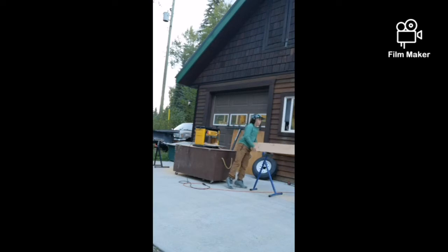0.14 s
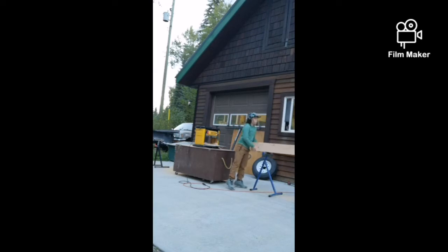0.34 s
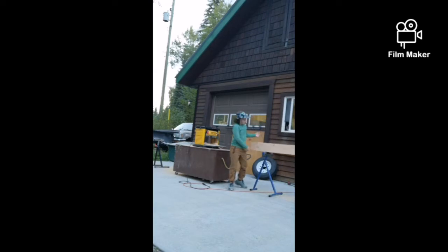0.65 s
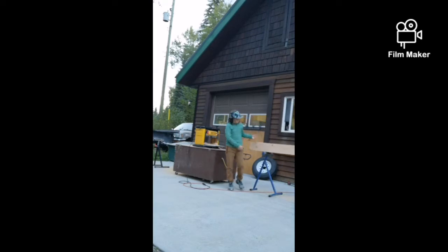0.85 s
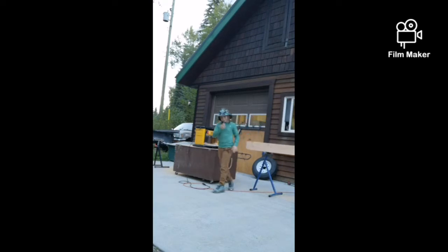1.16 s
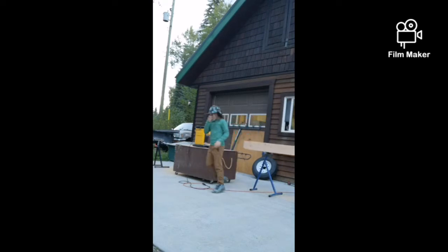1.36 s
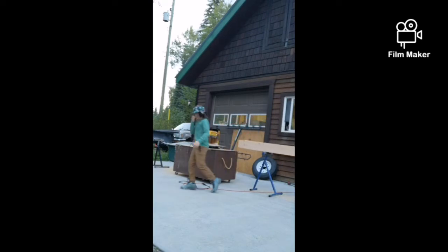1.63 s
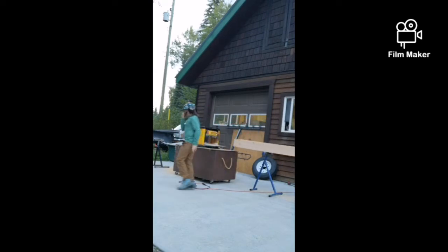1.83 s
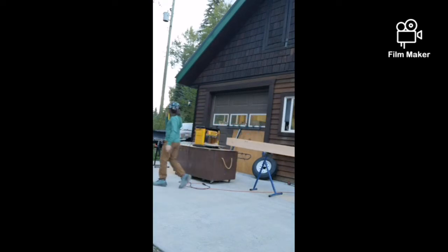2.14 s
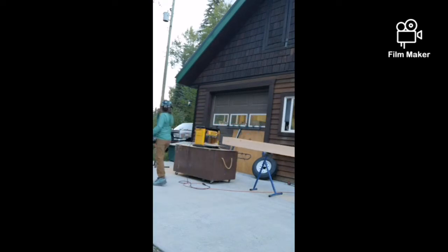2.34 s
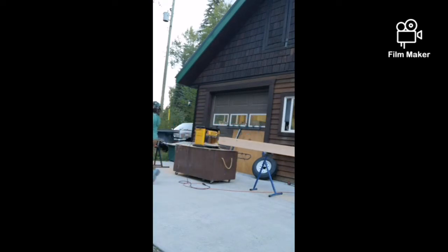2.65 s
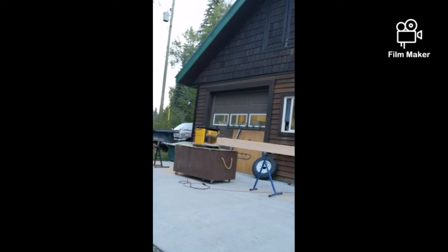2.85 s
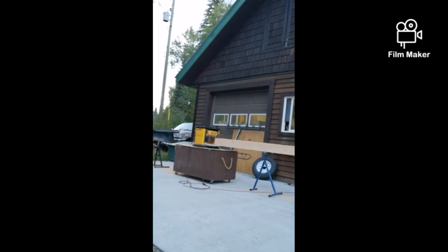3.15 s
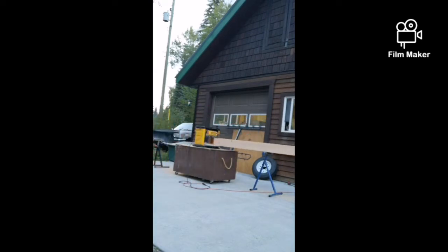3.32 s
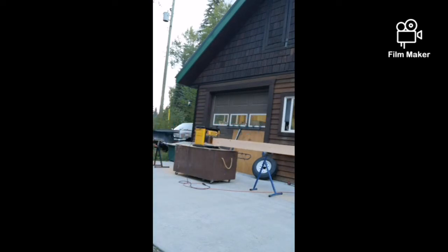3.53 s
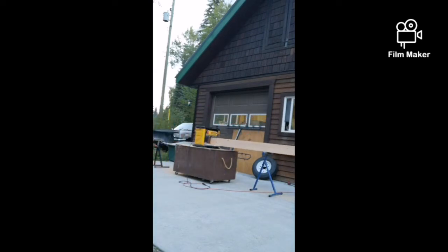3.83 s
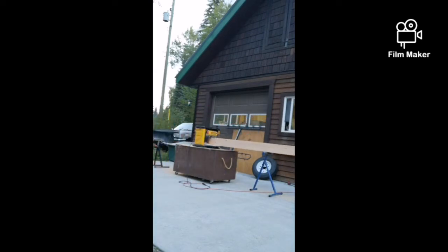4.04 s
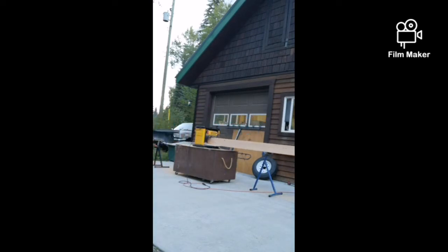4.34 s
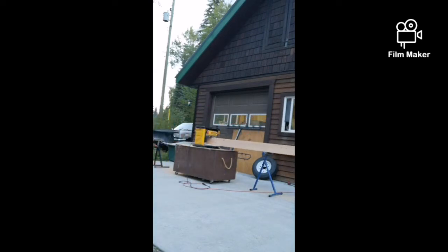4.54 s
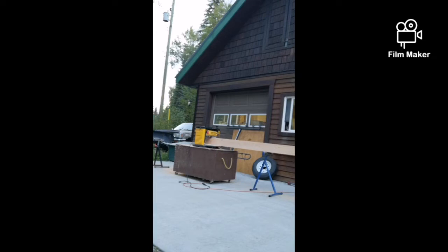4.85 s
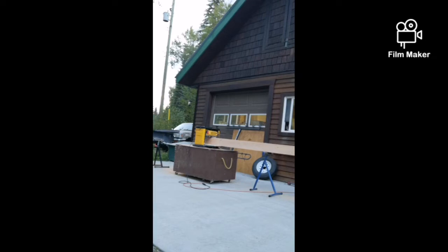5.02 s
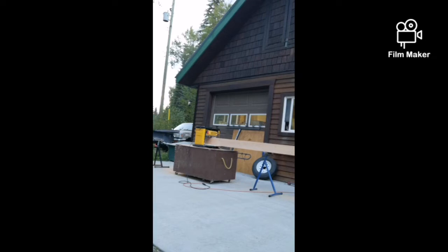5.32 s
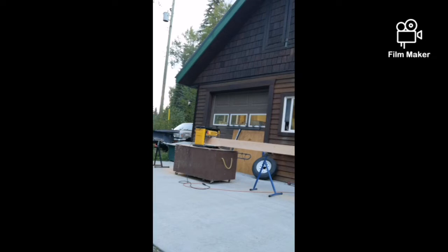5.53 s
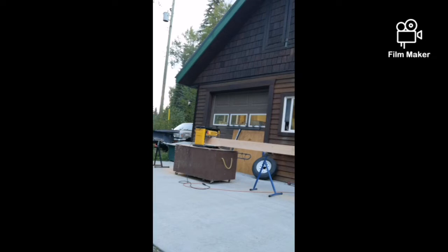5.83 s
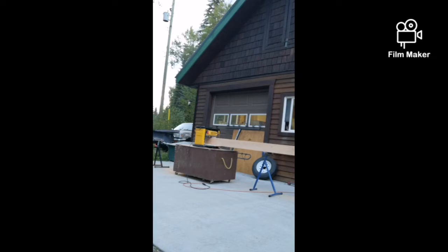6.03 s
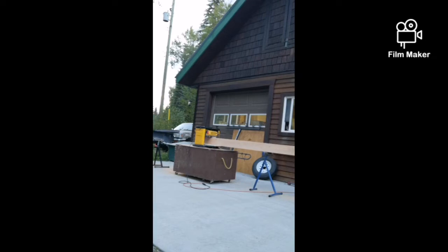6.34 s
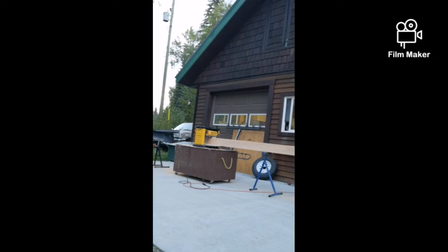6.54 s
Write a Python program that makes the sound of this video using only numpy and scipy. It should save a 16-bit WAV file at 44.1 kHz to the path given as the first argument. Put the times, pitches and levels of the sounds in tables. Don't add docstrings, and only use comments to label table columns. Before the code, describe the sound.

From 0 s a benchtop planer idles in an open paved yard: a constant low hum near 172 Hz, broad blowing fan roar and a thin electric whine, with slight wavering. Around 1.4 to 1.8 s the brightness dips gently as someone passes, then returns. A soft low wind puff comes at 3.2 s, with faint distant engine drone under the machine around 3 to 4.5 s. At about 4.66 s the knives strike a wooden post with a hard, bright bite, turning into a dense, raspy buzz with torn chips. From 4.8 to 5.8 s pitch slides down to about 131 Hz, whine fading, wood and housing ringing unevenly. It holds roughly steady, then at 6.2 to 6.35 s a knot brings a louder, squealing strain and another small sag. Cutting continues to the end near 6.7 s. Mono phone sound, metres away, dull above 8 kHz.

```python
import sys
import numpy as np
from scipy import signal
from scipy.fft import rfft, irfft
from scipy.io import wavfile
from scipy.ndimage import uniform_filter1d

SR = 44100
rng = np.random.default_rng(int(sys.argv[2]) if len(sys.argv) > 2 else 0)


def waveform_to_disk(signal):
    frames = np.transpose(np.atleast_2d(signal))
    scaled = np.clip(frames, -1, 1) * 32767
    samples = np.round(scaled).astype(np.int16)
    wavfile.write(sys.argv[1], SR, samples)


def level_to_linear(level):
    exponent = np.asarray(level, float) / 20
    return 10 ** exponent


N = 294588
TIME = np.arange(N) / SR

# time_s, turn_rate_hz
HEAD_SPEED = [(0, 171.93), (2.4, 172.1), (4.15, 172.05), (4.52, 171.72), (4.7, 171.2), (4.78, 170.04),
              (4.94, 165.67), (5.22, 157.42), (5.3, 154.31), (5.4, 149.39), (5.64, 135.84), (5.69, 133.66),
              (5.74, 132.45), (5.84, 131.44), (6.12, 131.42), (6.21, 130.34), (6.365, 127.55),
              (6.67, 128.31)]
IDLE_HZ, LOADED_HZ = 172, 128
MOTOR_PER_HEAD = 1.9777
MAINS_HZ = 120

# multiple, level_db
HEAD_ORDERS = [(3, -48), (4, -51.5), (6, -45), (20, -52)]
# pitch_hz, level_db
BED_ONCE = [(128, -36), (133.5, -35.5), (136, -26), (148, -19), (157.5, -25.5), (160.3, -38),
            (163.8, -19.5), (172, -20.5)]
# pitch_hz, level_db
BED_TWICE = [(256, -35), (265, -35.5), (272, -21.5), (282, -42), (299, -20.5), (313, -32), (340, -37),
             (344, -35.5)]
# centre_s, length_s, once_a_turn_db, twice_a_turn_db
POST_LEANS = [
    (.3, 0.76, 0, -4.5),
    (4.48, 0.11, -3, 1.5),
    (4.78, .04, -1.5, -2),
    (5.66, 0.034, 0, 3),
    (5.9, 0.097, -1, -16),
    (6.08, .05, -0.5, 5.5),
    (6.22, .04, 3, 3),
    (6.54, .1, -22, -4.5),
]

# multiple, level_db
MOTOR_ORDERS = [(12, -43), (15, -45.5), (16, -40), (17, -61.5), (19, -48.5), (20, -40), (21, -50)]
# pitch_hz, density_db_per_hz
FAN_SPECTRUM = [(24, -76), (40, -52), (132, -19), (151, -13), (172, -8), (192, -17.5), (206, -29.5),
                (342, -26.5), (408, -23.5), (436, -24), (1010, -31), (1320, -33.5), (4540, -33.5),
                (6920, -29), (7900, -47.5), (10300, -95.5), (17400, -120)]
FAN_DB = -31
# pitch_hz, width_hz, level_db
DUCTS = [(68, 30, -3), (95, 14, 2.5), (149, 86, -3), (175, 45, -10.5), (249, 22, 5), (435, 28, 3.5),
         (1040, 260, 4), (1326, 170, -7.5), (1555, 180, -5), (1642, 24, 9), (1930, 180, -5),
         (2173, 460, 5.5), (2637, 380, 4), (3010, 100, -3.5), (3460, 280, 4.5), (3890, 150, -3),
         (4540, 180, -5), (5280, 130, -3), (6350, 210, 3.5), (6550, 220, -7), (7110, 690, 6)]
# idle_db, change_behind_a_passer_db, change_at_full_load_db
TREBLE, BASS, WHINE = (2.12, -3, -2.5), (1.54, 0, -6.5), (0.37, -7, -19)
WHINE_FADES_LOAD = .03, .4
PASSER_S, PASSER_NEAR_S, PASSER_LEAVE_S = 1.73, 0.27, 0.079
# centre_s, length_s, hiss_db, whine_db
BRUSH_STRAINS = [
    (1.45, .08, -1, -1.5),
    (4.55, 0.19, -0.5, -3.5),
    (5.15, .12, 1.5, -2),
    (5.58, .13, 6.5, 0),
    (5.93, .2, -1.5, 0),
    (6.25, .09, 7, 0),
]
RIPPLE_IDLE_DB, RIPPLE_LOAD_DB = -59, 12

# start_s, level_db, length_s
WIND_PUFFS = [
    (3.2, -49, 0.11),
    (3.903, -60.5, 0.089),
    (4.21, -61, 0.11),
    (6.6, -63, 0.093),
]
# centre_s, length_s, level_db, pitch_hz
DISTANT_NOTES = [
    (2.9, 0.16, -50, 96.5),
    (3.45, .17, -45.5, 90),
    (3.75, .08, -52, 92),
    (4.4, .28, -51.5, 94),
    (4.5, .24, -43.5, 1655),
]

# time_s, depth_db, hardness_db
CUT = [
    (4.66, -44, 6),
    (4.71, -24, 9.5),
    (4.94, -25.5, -4.5),
    (5.1, -27.5, 1),
    (5.45, -25, -1.5),
    (5.7, -26.5, 0),
    (5.86, -29, -1),
    (6.15, -28.5, -1),
    (6.67, -28, -1.5),
]
USUAL_DEPTH_DB = -27
# centre_s, length_s, depth_db, hardness_db
GRAIN = [
    (4.79, 0.051, 1.5, 1),
    (5.1, 0.045, 1, 2),
    (5.22, 0.049, -0.5, -2.5),
    (5.3, 0.058, -0.5, 3),
    (5.61, .07, 4, -1.5),
    (5.75, 0.026, 2, 1),
    (5.92, 0.1, 0, 1.5),
    (6.2, 0.036, 1, 2),
    (6.3, 0.071, 5, 2),
]
# time_s, stage
GRIP = [
    (4.9, 0),
    (5.1, 1),
    (5.66, 1),
    (5.76, 2),
    (6.2, 2),
    (6.32, 3),
]
# multiple, entering_db, gripped_db, past_knot_db
BITE_SHAPE = [(3, 0.5, -3.5, 0.5), (6, .5, -0.5, 0.5), (7, -2.5, 0, .5), (8, -2.5, -2.5, 0),
              (10, -2.5, -1, -2), (12, 1, 2.5, .5), (17, 0.5, 3, 0), (4, 1, 4.5, -5.5), (9, -2, -5.5, -4.5),
              (11, 0, 0, 3.5), (15, 10, -2.5, -1), (19, 3.5, 6, -2), (21, -7, -1, 2.5), (23, 0, 1.5, -9),
              (24, 10, 8.5, -6.5), (26, 10, -1.5, -3.5), (29, 1, -7, -1), (30, -1, -4, -9), (32, -7, 9, 5)]
# pitch_hz, width_hz, entering_db, deeper_db, gripped_db
POST_MODES = [(385, 28, -9, -4, -1), (424, 30, -7.5, -10, -2.5), (454, 17, -0.5, -2, -7),
              (498.5, 25, -11, -22.5, -16.5), (558, 13, -9, -5, -0.5), (602.5, 26, -13, -3, -3.5),
              (650.3, 13, -3.5, -5.5, -12), (708, 25, -9, -7, -14), (769.3, 17, -4, -6, -3),
              (865, 20, -10.5, -5.5, -13.5), (897, 25, -14, -10, -12.5), (972.4, 17, 0, -3, -4),
              (1014.4, 26, -0.5, 0, -5.5), (1081, 7.7, -2, -2, -5), (1131, 9.3, -17, -5.5, -19.5),
              (1233, 65, -7, -15.5, -19.5), (1294, 20, -12, -16, -11)]
# pitch_hz, width_hz, entering_db, deeper_db, gripped_db
HOUSING_MODES = [(1423, 15, -15, -3, -9.5), (1453, 25, -12, -7.5, -4.5), (1558, 46, -4.5, -4, -2.5),
                 (1673, 49, -19, -3.5, -17), (1729, 16, -12, 1, -4.5), (1825, 60, -7.5, -7.5, -3.5),
                 (1918, 51, -14.5, -9.5, -8.5), (2099, 43, -9, -4.5, -2.5), (2155, 23, -2.5, -7, -4),
                 (2282, 67, -9.5, -8.5, -10.5), (2344, 27, -2.5, -6.5, -3.5), (2439, 24, -12.5, -1, -6),
                 (2617, 23, -6.5, -5, -1.5), (2694, 32, -4, -5.5, -11.5), (2750, 61, -6.5, -19, -11.5),
                 (2936, 28, -6, -14, -9.5), (3030, 60, -8.5, -12, -15.5), (3130, 24, -20, -7.5, -16.5),
                 (3316, 50, -10, -18, -11), (3440, 71, 1.5, -6.5, -8.5), (3533, 51, -9, -10.5, -8.5),
                 (3680, 59, -25.5, -15, -14.5), (3903, 25, -12.5, -4, -7)]
# pitch_hz, width_hz, entering_db, deeper_db, gripped_db
EDGE_MODES = [(4246, 100, 1.5, -1.5, -5), (4294, 39, -2, -5, 6), (4520, 90, -10, 0.5, 0.5),
              (4680, 71, -4.5, -4.5, -7.5), (4935, 68, -5.5, 0, -5), (5110, 94, -3.5, -12.5, -15),
              (5590, 120, -7.5, -7.5, -6.5), (5700, 79, -6.5, -3.5, -3.5), (6290, 98, -2.5, -4.5, -11.5),
              (6400, 110, -9.5, -6, -8), (6950, 200, -1.5, 1, -3.5)]
# level_db, db_per_db_of_depth, db_per_db_of_hardness
POST_SHARE, HOUSING_SHARE = (0, 0.84, -1.07), (0, 1.14, 0.11)
EDGE_SHARE, CHIPS_SHARE = (-7, 0.91, 0.69), (-17, 0.9, -0.31)
TORN = .05, .25, .55
# pitch_hz, width_hz, level_db
HOOD = [(440, 310, 4), (1060, 190, -1.5), (2290, 1100, -1), (3450, 500, 2), (4600, 750, 5), (6200, 460, -4),
        (6950, 180, -6)]
# centre_s, length_s, level_db, pitch_hz
KNOTS = [(6.19, 0.04, -27.5, 6860), (6.27, 0.091, -26, 6800), (6.24, .09, -31, 6200),
         (5.33, .05, -34, 2480), (5.48, .03, -32, 2650), (5.655, 0.043, -26, 1080),
         (6.21, 0.036, -35, 2650), (5.25, 0.045, -34, 1740), (6.25, .035, -34, 2080),
         (6.2, 0.035, -40, 4750), (5.38, 0.062, -35.5, 2150), (5.6, 0.064, -33, 2600),
         (5.42, 0.046, -32, 1760), (4.93, 0.071, -33, 2170), (6.217, 0.046, -40, 2100),
         (6.8, .04, -30, 1800), (6.285, 0.04, -23.5, 1026)]
KNOT_WIDTH = .1


def curves(table):
    s, *columns = np.transpose(table)
    return [np.interp(TIME, s, c) for c in columns]


def bump(s, before, after):
    return np.exp(-((TIME - s) / np.where(TIME < s, before, after)) ** 2)


def swells(events):
    return sum(np.outer(dbs, bump(s, length, length)) for s, length, *dbs in events)


def unit(x):
    return x / np.sqrt(np.mean(x ** 2))


def resonate(x, hz, width):
    return signal.lfilter(*signal.iirpeak(hz, hz / width, SR), x)


def walk(rate):
    k = int(SR / rate)
    held = np.repeat(rng.standard_normal(N // k + 1), k)
    return 1.54 * uniform_filter1d(uniform_filter1d(held, k), k)[:N]


def tones(phase, orders, flutter_db):
    total = np.zeros(N)
    for k, db in orders:
        level = level_to_linear(db + flutter_db * walk(14))
        total += level * np.sqrt(2) * np.sin(k * phase + 2 * np.pi * rng.random())
    return total


def head(phase, hz):
    once_db, twice_db = swells(POST_LEANS)
    once_db = once_db + np.interp(hz, *np.transpose(BED_ONCE)) + 0.39 * walk(30)
    twice_db = twice_db + np.interp(2 * hz, *np.transpose(BED_TWICE)) + 1.4 * walk(16)
    shake = level_to_linear(once_db) * np.sin(phase) + level_to_linear(twice_db) * np.sin(2 * phase + 2.23)
    return np.sqrt(2) * shake + tones(phase, HEAD_ORDERS, flutter_db=1.5)


def motor(phase, load):
    shade = np.minimum(1.1 * bump(PASSER_S, PASSER_NEAR_S, PASSER_LEAVE_S), 1)
    loads = load, load, np.interp(load, WHINE_FADES_LOAD, (0, 1))
    treble_db, bass_db, whine_db = (idle + shaded * shade + loaded * x
                                    for (idle, shaded, loaded), x in zip((TREBLE, BASS, WHINE), loads))
    treble_db, whine_db = swells(BRUSH_STRAINS) + [treble_db, whine_db]

    hz = np.maximum(np.fft.rfftfreq(N, 1 / SR), 1)
    fan_hz, fan_db = np.transpose(FAN_SPECTRUM)
    shape_db = np.interp(np.log(hz), np.log(fan_hz), fan_db)
    shape_db = shape_db + sum(db * np.exp(-(2 * (hz - f) / w) ** 2) for f, w, db in DUCTS)
    roar = rfft(unit(irfft(rfft(rng.standard_normal(N)) * level_to_linear(shape_db), N)))

    treble_share = 1 / (1 + (1600 / hz) ** 4)
    mains = 2 * np.pi * MAINS_HZ * TIME
    treble = irfft(roar * treble_share, N) * (1 + .12 * np.cos(phase) + 0.046 * np.cos(mains))
    bass = irfft(roar * (1 - treble_share), N)
    treble = level_to_linear(FAN_DB + treble_db + 0.86 * walk(6)) * treble
    bass = level_to_linear(FAN_DB + bass_db + 0.2 * walk(8)) * bass

    whine = level_to_linear(whine_db) * tones(phase, MOTOR_ORDERS, flutter_db=0.66)
    shaft = level_to_linear(-42.5) * np.sin(phase + 3.2)
    ripple = level_to_linear(RIPPLE_IDLE_DB + RIPPLE_LOAD_DB * load ** 2) * np.sin(mains)
    return treble + bass + whine + shaft + ripple


def wind():
    rumble = unit(resonate(resonate(rng.standard_normal(N), 32., 40.), 32., 60.))
    gusts = sum(level_to_linear(db) * np.exp(-np.abs(TIME - s) / np.where(TIME < s, .03, length))
                for s, db, length in WIND_PUFFS)
    return rumble * (gusts + level_to_linear(-69.5))


def drone():
    return sum(level_to_linear(db) * np.exp(-((TIME - s) / length) ** 4) * np.sin(2 * np.pi * hz * TIME)
               for s, length, db, hz in DISTANT_NOTES)


def ring(bites, modes, stage):
    body = sum(level_to_linear(np.interp(stage, range(3), dbs)) * resonate(bites, f, w) for f, w, *dbs in modes)
    limits_hz = 1.09 * modes[0][0], 0.98 * modes[-1][0]
    return unit(signal.sosfilt(signal.butter(3, limits_hz, "bandpass", fs=SR, output="sos"), body))


def knives(phase):
    start = int(CUT[0][0] * SR)
    turn, time = phase[start:], TIME[start:]
    stage = np.interp(time, *np.transpose(GRIP))
    shape = {k: level_to_linear(np.interp(stage, range(4), (first, 0, *later))) for k, first, *later in BITE_SHAPE}

    loose = np.interp(stage, (1, 2), (1, .4))
    steps = np.linspace(time[0], time[-1], 70)
    bites = np.zeros(N - start)
    for k in range(3, 62):
        flicker = np.interp(time, steps, rng.standard_normal(70))
        wander = 1 + (.08 + .014 * k) * loose * flicker
        stagger = 2 * np.pi * rng.random()
        bites += shape.get(k, 1) * wander * np.cos(k * turn + stagger)
    bites = unit(bites) * level_to_linear(0.74 * walk(120)[start:])

    depth_db, hard_db = (curves(CUT) + swells(GRAIN))[:, start:]
    shares = POST_SHARE, HOUSING_SHARE, EDGE_SHARE, CHIPS_SHARE
    *ring_dbs, chips_db = (USUAL_DEPTH_DB + db + a * (depth_db - USUAL_DEPTH_DB) + b * hard_db
                           for db, a, b in shares)

    chips = rng.standard_normal(N - start) * (1 + 0.23 * np.cos(turn))
    out = level_to_linear(chips_db) * sum(level_to_linear(db) * unit(resonate(chips, f, w)) for f, w, db in HOOD)
    for modes, ring_db, torn in zip((POST_MODES, HOUSING_MODES, EDGE_MODES), ring_dbs, TORN):
        out = out + level_to_linear(ring_db) * ring(bites + torn * loose * chips, modes, stage)

    for s, length, db, f in KNOTS:
        w = KNOT_WIDTH * f
        scrape = level_to_linear(1.5 * walk(60)[start:]) * bites + f / 5000 * chips
        squeal = unit(resonate(resonate(scrape, f, w), f, w))
        out = out + level_to_linear(db) * np.exp(-((time - s) / length) ** 2) * squeal
    fade_in = np.minimum(np.arange(N - start) / 900, 1)
    return np.concatenate([np.zeros(start), out * fade_in])


def scene():
    head_hz, = curves(HEAD_SPEED)
    phase = 2 * np.pi * np.cumsum(head_hz) / SR
    load = np.clip((IDLE_HZ - head_hz) / (IDLE_HZ - LOADED_HZ), 0, 1)
    machine = head(phase, head_hz) + motor(MOTOR_PER_HEAD * phase, load) + knives(phase)
    mono = machine + wind() + drone()
    return np.array([mono, mono])


def roll_off(x):
    return signal.sosfilt(signal.butter(12, 8550, fs=SR, output="sos"), x)


def record(dry):
    rounded = np.tanh(1.302 * dry) / 1.294
    soft = signal.sosfilt(signal.butter(12, 7300, fs=SR, output="sos"), rounded)
    top = signal.ellip(12, .3, 80, 7830, fs=SR, output="sos")
    return roll_off(signal.sosfilt(top, soft))


dry = scene()
out = record(dry)
waveform_to_disk(out)
```